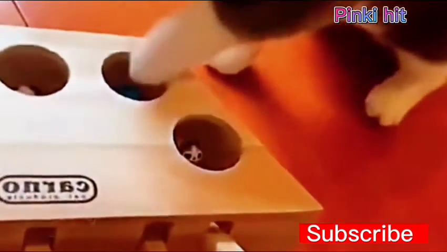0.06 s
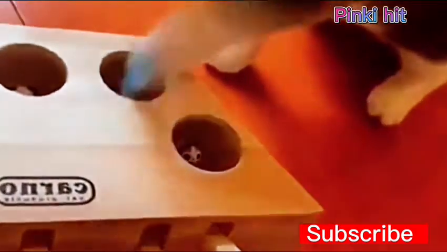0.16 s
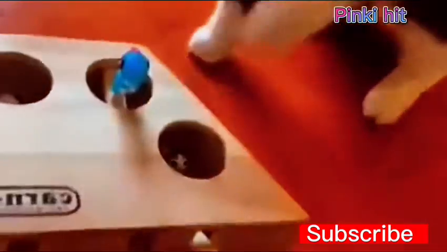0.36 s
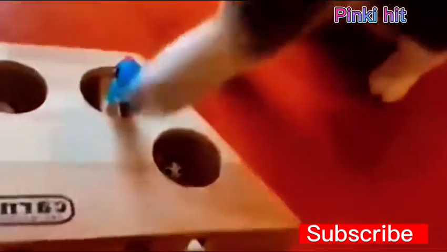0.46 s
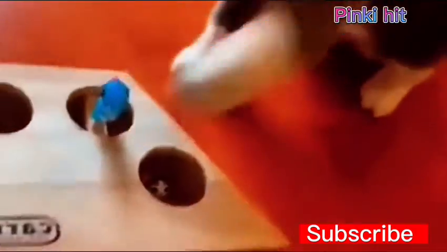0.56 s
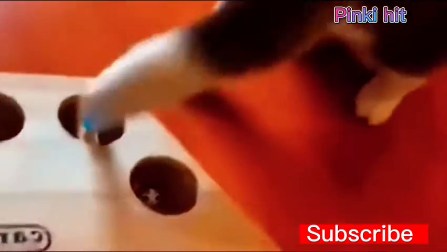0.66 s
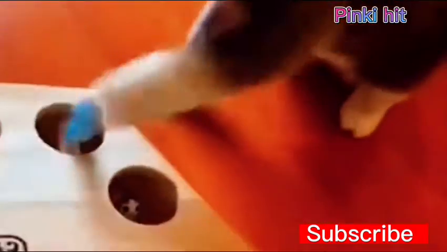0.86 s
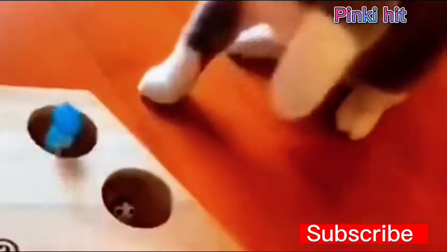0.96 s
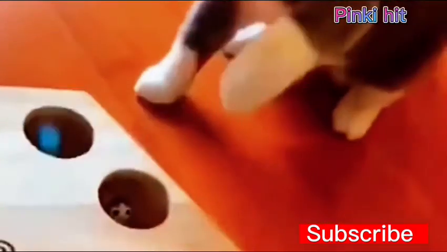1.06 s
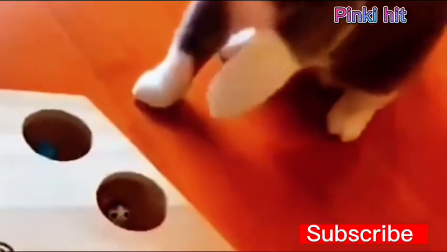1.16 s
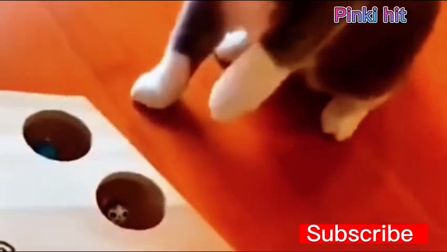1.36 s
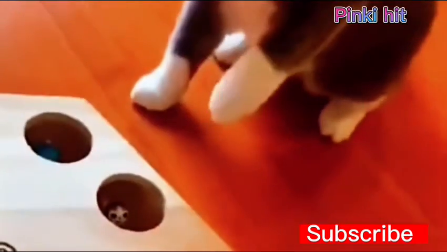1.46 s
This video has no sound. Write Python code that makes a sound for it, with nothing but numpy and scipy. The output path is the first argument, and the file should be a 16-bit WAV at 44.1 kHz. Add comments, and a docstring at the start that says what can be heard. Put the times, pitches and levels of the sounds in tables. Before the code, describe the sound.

A wooden toy box gives a sharp double clack as a cat pops up its peg. After a pause comes a light tick, then the peg drops with a hollow knock and bounces, heard nearby in a small room.

```python
"""Cat and wooden pop-up toy

A cat plays with a toy box on the floor of a small room. A lever throws a peg against its stop with one
hard crack, and a paw brushes the peg; later it slips with a tiny friction squeak, drops into the box and
bounces. Each impact excites the damped resonances of the box, which drive the room's standing waves
and a brief reverberation. A low rumble and a faint hum lie underneath."""
import sys
import numpy as np
from scipy import signal
from scipy.fft import rfft, irfft
from scipy.io import wavfile

SR = 44100
rng = np.random.default_rng(int(sys.argv[2]) if len(sys.argv) > 2 else 0)


def file_out(sig):
    """Save sig as 16-bit WAV at sys.argv[1]."""
    # one column per channel
    cols = np.atleast_2d(sig).T
    # limit, then scale
    lim = np.clip(cols, -1, 1)
    pcm = np.round(lim * 32767).astype(np.int16)
    wavfile.write(sys.argv[1], SR, pcm)


N = 66150
TIME = np.arange(N) / SR
HZ = np.arange(N // 2 + 1) * SR / N
ROOM_DELAY_S, ROOM_BUILD_S = 0.006215, 0.0045

# A faint lead-in that softens the onset of the first crack (first row), then the contacts of the peg:
# t/s, level/dB, place (0 = upper stop, 1 = box bottom), tilt/(dB per octave),
# relative crack level/dB, relative level into the room/dB
EXCITATIONS = [(0.2085, -25, 0.022, 1.5, 6, 3.5), (0.2153, -1, 0.021, 0, -0.5, -1.5),
               (0.2280, -3, 0.44, -3.5, -9.5, 3.5), (0.25, -18, 0.37, -2.5, -32, 14.5),
               (0.8533, -19.5, 0.96, -1.5, -1.5, -1), (1.1048, 1.5, 1, 1.5, -8, -3),
               (1.1384, -12.5, 1, 0, -23.5, -12), (1.1724, -9, 0.81, -3, -9.5, 0),
               (1.2177, -15.5, 0.83, -4.5, -26, -4), (1.2475, -24.5, 0.55, -5, -22, -26.5)]
# Spectrum of rubbing noise: f/Hz, level/dB
FRICTION_SPECTRUM = [(400, 5), (900, 6), (3000, -13), (7000, -11), (13000, -23)]


def from_db(db):
    """Amplitude ratio of a level in decibels."""
    return 10 ** (np.asarray(db) / 20)


def unit_rms(x):
    """Normalisation to unit mean power."""
    return x / np.sqrt(np.mean(x ** 2) + 1e-20)


def at_hz(points, hz):
    """Interpolation of a spectrum on a logarithmic frequency axis."""
    freqs, values = np.transpose(points)
    return np.interp(np.log(np.maximum(hz, 1)), np.log(freqs), values)


def noise(spectrum):
    """Spectral shaping of white noise, at unit power."""
    return unit_rms(irfft(rfft(rng.standard_normal(N)) * from_db(at_hz(spectrum, HZ)), N))


def since(start):
    """Elapsed time in seconds, zero before the start."""
    return np.maximum(TIME - start, 0)


def damped_envelope(t, rise, t60):
    """Exponential decay with a rounded onset."""
    return (1 - np.exp(-np.minimum(t / rise, 10) ** 2)) * np.exp(-np.log(1000) * np.minimum(t / t60, 10))


def burst(start, rise, t60):
    """A damped envelope normalised to unit energy."""
    return unit_rms(damped_envelope(since(start), rise, t60)) / np.sqrt(N)


def stroke(start, length):
    """A half-sine pulse of rubbing pressure."""
    return np.abs(np.sin(np.pi * np.minimum(since(start) / length, 1)))


def minimum_phase(gain):
    """Causality: the one-sided cepstrum gives a magnitude response its phase."""
    cepstrum = irfft(np.log(gain), N)
    return gain * np.exp(2j * rfft(cepstrum * (np.arange(N) < N // 2)).imag)


def background():
    """Superposition of room air, rumble, a phase-modulated drone and an amplitude-modulated hum."""
    # Spectra of the air and the rumble: f/Hz, level/dB
    air_spectrum = [(60, -20), (110, -8), (200, -4), (300, -8.5), (420, -12), (600, -18), (900, -13),
                    (1300, -19.5), (2000, -25), (3000, -34), (4200, -41), (6000, -49), (9000, -55),
                    (14000, -80.5)]
    rumble_spectrum = [(15, -10), (30, -7), (45, -1.5), (62, -0.5), (80, -9.5), (130, -18), (300, -63)]
    # Throb of the drone: t/s, level/dB
    drone_levels = [(0, -40.5), (0.14, -42), (0.28, -46.5), (0.38, -39.5), (0.65, -39.5), (0.76, -49.5),
                    (1.04, -39.5), (1.24, -52.5), (1.45, -46)]
    drone_hz, hum_hz = 38, 170
    waver = noise([(5, 0), (30, -60), (200, -120)])
    throb = from_db(np.interp(TIME, *np.transpose(drone_levels)))
    drone = throb * np.sin(2 * np.pi * drone_hz * TIME + 0.12 * waver)
    hum = from_db(-56) * np.sin(2 * np.pi * hum_hz * TIME) * (1 + 0.11 * waver)
    air = from_db(-50.5) * noise(air_spectrum)
    rumble = from_db(-46) * noise(rumble_spectrum)
    return air + rumble + np.sqrt(2) * (drone + hum)


def reverberation(x):
    """Convolution with dense early reflections and a diffuse tail that decays band by band."""
    # Diffuse field: f/Hz, level/dB, T60/s
    bands = [(120, -4.5, 0.58), (305, -9, 0.29), (486, -10.5, 0.46), (637, 2.5, 0.45), (875, -12, 0.51),
             (1430, 2, 0.58), (2000, -5, 0.57), (3780, -4, 0.54), (7100, -9, 0.42), (14000, -5, 0.29)]
    centres = np.array(bands)[:, 0]
    white = rfft(rng.standard_normal(N))
    response = from_db(-9) * rng.standard_normal(N) * burst(ROOM_DELAY_S, ROOM_BUILD_S, t60=0.084)
    for weights, (_, db, t60) in zip(np.eye(len(bands)), bands):
        band = irfft(white * at_hz(np.c_[centres, weights], HZ), N)
        response += from_db(db) * band * burst(ROOM_DELAY_S, ROOM_BUILD_S, t60)
    return signal.fftconvolve(x, response)[:N]


def standing_waves():
    """Normal modes of the room decay freely, each as strongly as the box drives it."""
    # Room modes: f/Hz, level/dB, T60/s
    modes = [(241.8, -31.5, 0.5), (341.8, -17, 0.33), (435.6, -41, 0.9), (492, -33, 0.41),
             (545.7, -37.5, 0.22), (723.7, -32, 0.24), (820, -27.5, 0.31), (863, -41.5, 0.78),
             (1456, -42.5, 0.18)]
    start, db, place, tilt, _, room_db = np.transpose(EXCITATIONS)
    arrivals = ((start + ROOM_DELAY_S) * SR).astype(int)
    out = np.zeros(N)
    for hz, mode_db, t60 in modes:
        ring = np.sin(2 * np.pi * hz * TIME) * damped_envelope(TIME, ROOM_BUILD_S, t60)
        drive = from_db(mode_db + db + room_db) * box_response(place, tilt, hz) / box_response(0, 0, hz)
        for first, gain in zip(arrivals, drive):
            out[first:] += gain * ring[:N - first]
    return out


def paw_brush():
    """Friction noise of fur on the peg, its amplitude following the pressure."""
    # Paw strokes: t/s, duration/s, level/dB
    brushes = [(0.38, 0.32, -58.5)]
    return sum(from_db(db) * stroke(start, length) * noise(FRICTION_SPECTRUM)
               for start, length, db in brushes)


def peg_slip():
    """Sliding friction of wood on wood: a falling squeak in a puff of hiss."""
    # Slips of the peg in its hole: t/s, duration/s, squeak level/dB, hiss level/dB
    slips = [(0.8452, 0.015, -52.5, -47.5)]
    squeak_hz, fall_hz_per_s = 4900, 65000
    out = np.zeros(N)
    for start, length, squeak_db, hiss_db in slips:
        t = since(start)
        squeak = from_db(squeak_db) * np.sin(2 * np.pi * (squeak_hz - fall_hz_per_s * t / 2) * t)
        hiss = from_db(hiss_db) * noise(FRICTION_SPECTRUM)
        out += np.sqrt(stroke(start, length)) * (squeak + hiss)
    return out


def box_response(place, tilt, hz):
    """Damped resonances of the box add in power; the hardness of the blow tilts the spectrum."""
    # Box modes: f/Hz, level struck at the stop/dB, level struck at the bottom/dB, bandwidth/Hz
    modes = [(212, -15, -15, 76), (300, -0.5, -26, 193), (418, -10.5, 1, 61), (482, -8, -5, 83),
             (744.4, -11, -14.5, 125), (883.6, 3.5, -7, 102), (1082, -7.5, -22, 195),
             (1157, -20, -22.5, 160), (1459, -15, -19, 71), (1993, -3, -25, 246), (2410, -12.5, -33, 300),
             (3560, -23, -42, 1100), (4115, -15.5, -43.5, 330), (5100, -25.5, -53.5, 280)]
    bass_cut_hz = 161  # the small box radiates little below this
    power = 0
    for centre, stop_db, bottom_db, width in modes:
        peak = from_db((1 - place) * stop_db + place * bottom_db)
        power += (peak / (1 + (2 * (hz - centre) / width) ** 2)) ** 2
    radiation = hz ** 2 / (hz ** 2 + bass_cut_hz ** 2) + 1e-4
    octaves = np.log2(np.maximum(hz, bass_cut_hz) / 1000)
    return np.sqrt(power) * radiation * from_db(tilt * octaves)


def box_knock(start, place, tilt, crack_db):
    """A crack, then a thud whose lows lag by bending-wave dispersion. Returns direct sound, room feed."""
    # Spectrum of the crack: f/Hz, level/dB
    crack_spectrum = [(300, 13), (1000, 5.5), (2500, 11), (3400, -3.5), (5000, -2.5), (7000, -1.5),
                      (10000, -10), (13500, -23)]
    thud_delay_s = 0.000699  # the panels start to move just after the crack
    bend_delay_s = 0.0017  # group delay of a 1 kHz bending wave
    dulling_db = 23.5 * place * HZ / 10000  # contacts inside the box lose treble
    box_gain = box_response(place, tilt, HZ)
    crack_gain = from_db(-27 + crack_db + at_hz(crack_spectrum, HZ) - dulling_db)
    lag = np.exp(-2j * np.pi * (HZ * (start + thud_delay_s) + 2 * bend_delay_s * np.sqrt(1000 * HZ)))
    crack = crack_gain * rfft(burst(start, rise=0.0013, t60=0.022) * rng.standard_normal(N))
    thud = minimum_phase(box_gain) * lag
    room_feed = minimum_phase(np.hypot(box_gain, crack_gain)) * lag
    return irfft([thud + crack, room_feed], N)


def scene():
    """Superposition of the direct sound of toy and paw, the room's response and the background."""
    slip = peg_slip()
    direct = slip + paw_brush()
    into_room = from_db(-1) * slip  # the hole shields the squeak from the room
    for start, db, place, tilt, crack_db, room_db in EXCITATIONS:
        knock, room_feed = from_db(34 + db) * box_knock(start, place, tilt, crack_db)
        direct += knock
        into_room += from_db(room_db) * room_feed
    return (direct + reverberation(into_room) + standing_waves() + background())[None]


def record(dry):
    """Soft saturation rounds the highest peaks; a steep low-pass filter removes the top."""
    ceiling, cutoff_hz = 0.88, 14000
    rounded = dry / (1 + (dry / ceiling) ** 8) ** (1 / 8)
    return signal.sosfilt(signal.ellip(10, .2, 80, cutoff_hz, fs=SR, output="sos"), rounded)


dry = scene()
out = record(dry)
file_out(out)
```